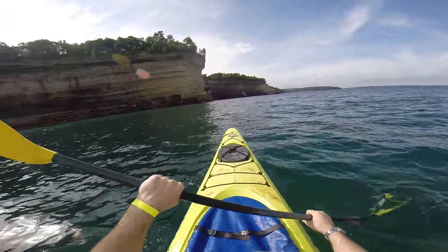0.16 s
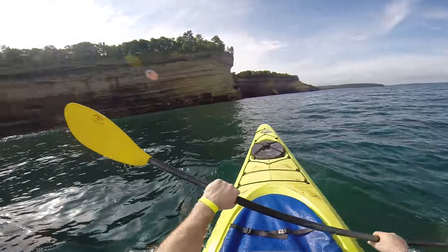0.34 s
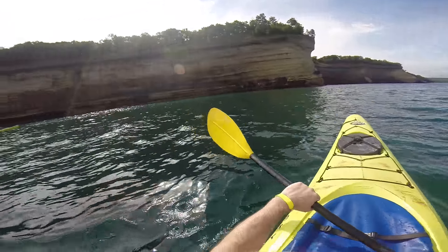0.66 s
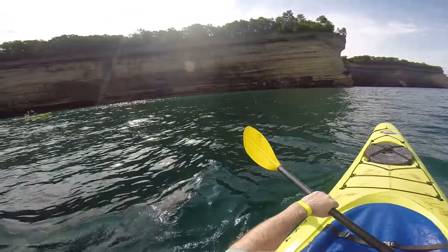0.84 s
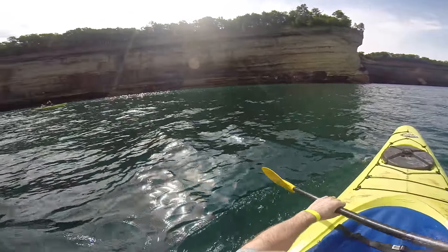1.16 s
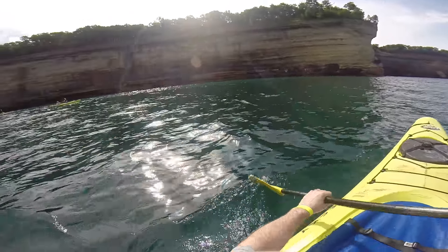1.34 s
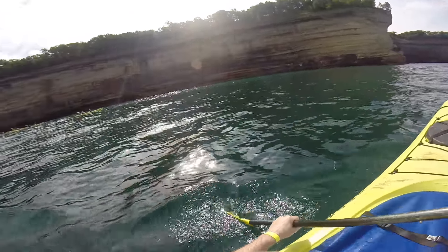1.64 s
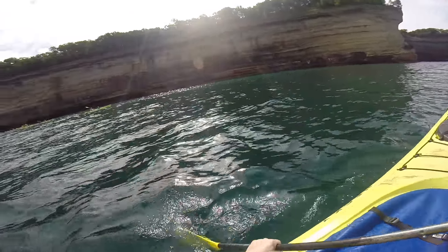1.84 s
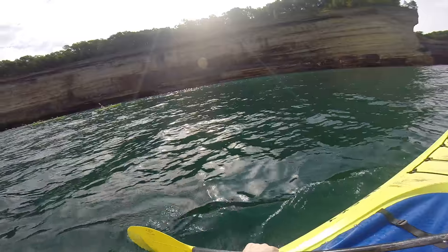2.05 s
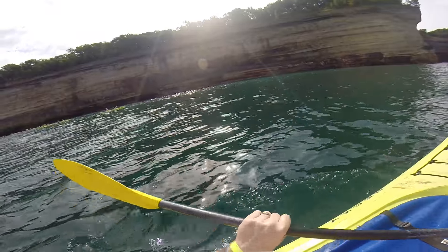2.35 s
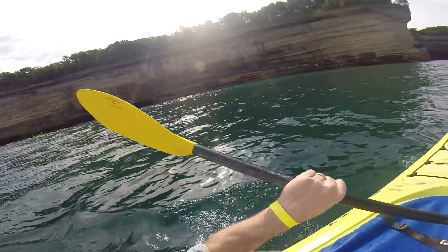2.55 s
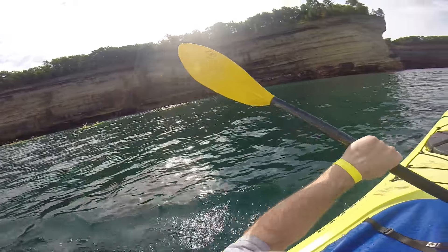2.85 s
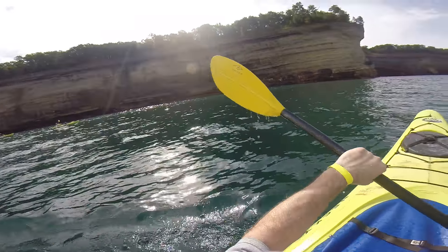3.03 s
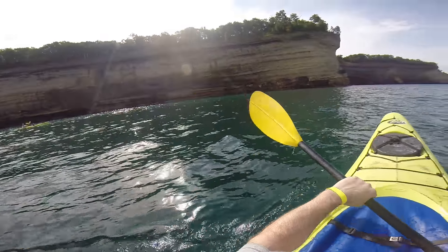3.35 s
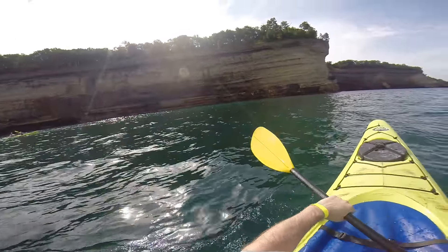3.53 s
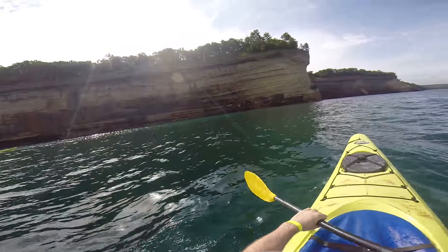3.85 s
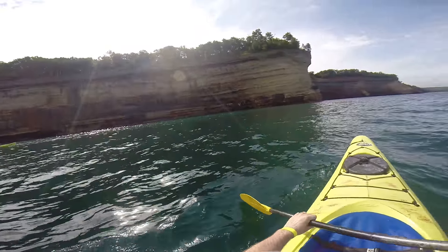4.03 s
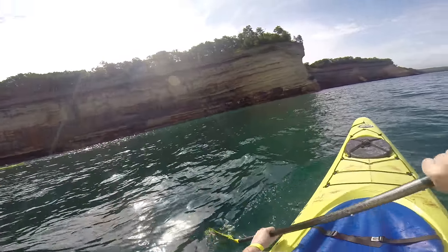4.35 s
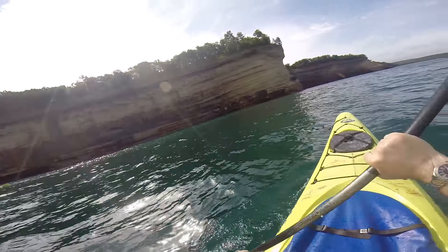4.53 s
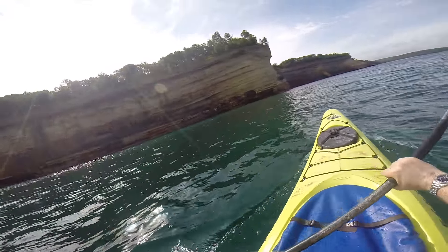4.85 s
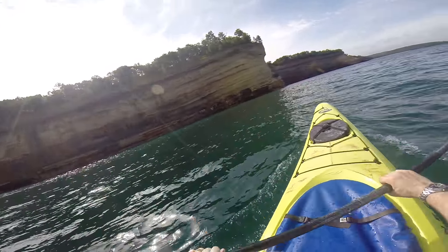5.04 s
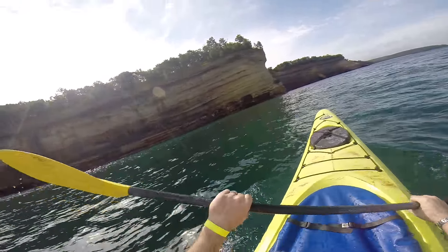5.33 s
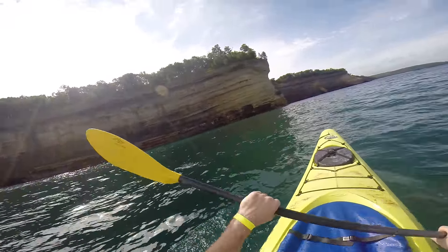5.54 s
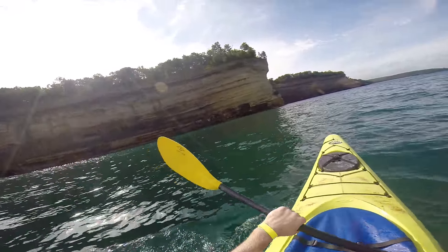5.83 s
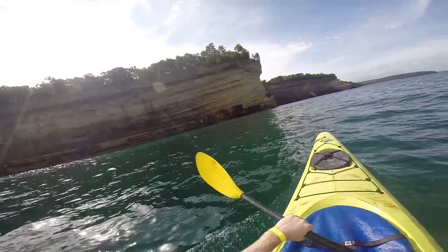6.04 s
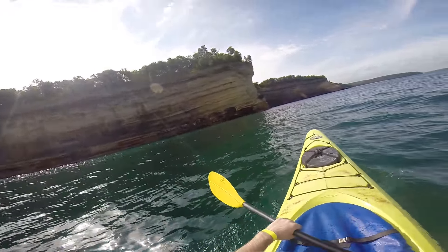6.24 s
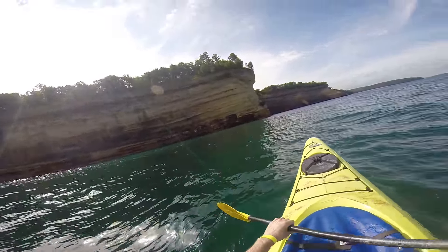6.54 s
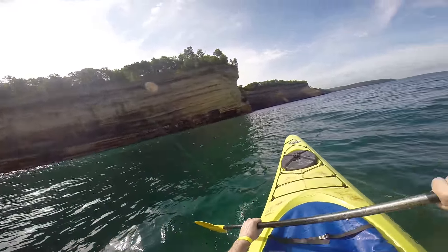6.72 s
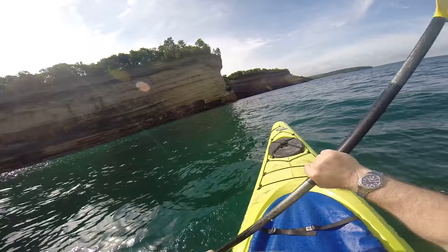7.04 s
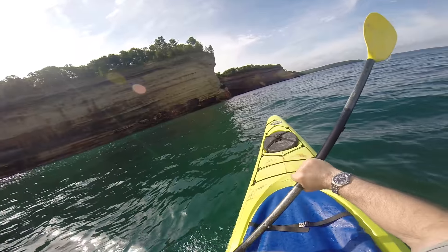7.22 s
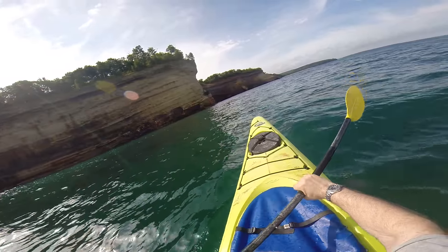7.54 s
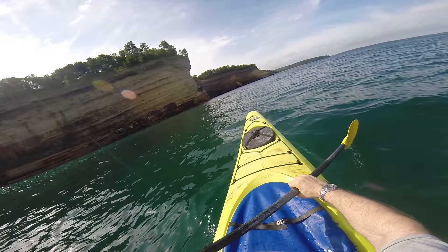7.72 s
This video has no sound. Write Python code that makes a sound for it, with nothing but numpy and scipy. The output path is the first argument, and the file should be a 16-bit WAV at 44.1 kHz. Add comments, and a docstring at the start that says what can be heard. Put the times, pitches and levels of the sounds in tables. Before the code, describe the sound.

Close watery churning with bubbly plops, small gulps and slaps from steady paddle strokes, over a soft water wash and muffled low rumble.

```python
"""Air buffets a waterproof case with a low rumble over the wash of open water: slow noise and drummed
resonances. A kayak's blades churn the water: clouds of short rings swell with each stroke, and wavelets lap in
a hollow note. Bubbles and drips plop as single bending chirps, and knocks ring the case in a shared note near
1.56 kHz; trapped air gulps as a tumble of larger bubbles. Slaps of water burst into grainy spatter, and the
paddle ticks now and then with a few hard, short modes. The camera inside the case adds its own faint hiss and
whine."""
import sys
import numpy as np
from scipy import signal
from scipy.fft import rfft, irfft, next_fast_len
from scipy.io import wavfile
from scipy.ndimage import uniform_filter1d

SR = 44100
rng = np.random.default_rng(int(sys.argv[2]) if len(sys.argv) > 2 else 0)


def inscribe(sig):
    """Save sig as 16-bit PCM at rate SR to the path in sys.argv[1].

    A 1-D sig is mono; a 2-D sig holds one channel per row.
    Samples are clipped to [-1, 1] before scaling.
    """
    pcm = np.round(np.clip(np.atleast_2d(sig).T, -1, 1) * 32767)
    wavfile.write(sys.argv[1], SR, pcm.astype(np.int16))


N = 347508
T = np.arange(N) / SR


def from_db(db):
    """Amplitude of a level in dB."""
    return 10 ** (np.asarray(db) / 20)


def rms_one(x):
    """Scales to rms 1."""
    return x / np.sqrt(np.mean(x ** 2) + 1e-20)


def in_time(rows):
    """Interpolates every column after the first over time."""
    knot_s, *columns = np.transpose(rows)
    return [np.interp(T, knot_s, column) for column in columns]


def at_hz(points, hz):
    """Reads a spectrum in dB on a log-frequency axis."""
    point_hz, point_db = np.array(points)[:, 0], np.array(points)[:, 1]
    return np.interp(np.log(hz + 1e-9), np.log(point_hz), point_db)


def drift(rate_hz):
    """Slow random control, rms 1: low-passed noise made at SR / 40."""
    step, settle = 40, 2000
    r = np.exp(-2 * np.pi * step * rate_hz / SR)
    white = rng.standard_normal(N // step + settle + 2)
    slow = signal.lfilter([1], [1, -2 * r, r * r], white)[settle:]
    return np.interp(np.arange(N) / step, np.arange(len(slow)), rms_one(slow))


def noise(spectrum, size=N, grain_db=0):
    """Coloured noise, rms 1; grain spreads the sample sizes, as of tiny uneven impacts."""
    padded = next_fast_len(size)
    hz = np.arange(padded // 2 + 1) * SR / padded
    grain = from_db(grain_db * rng.standard_normal(padded))
    white = rng.standard_normal(padded) * grain
    coloured = irfft(rfft(white) * from_db(at_hz(spectrum, hz)), padded)
    return rms_one(coloured[:size])


def resonate(x, hz, width_hz):
    """Two-pole resonance, gain 1 on top."""
    r = np.exp(-np.pi * width_hz / SR)
    zeros = np.array([1, 0, -1]) * (1 - r * r) / 2
    poles = [1, -2 * r * np.cos(2 * np.pi * hz / SR), r * r]
    return signal.lfilter(zeros, poles, x + 1e-18)


def ring_twice(x, hz, width_hz):
    """A resonance applied twice: soft start, steep skirts."""
    return resonate(resonate(x, hz, width_hz), hz, width_hz)


def evened(x, size):
    """Holds the level near 1 over stretches of size samples; faster detail stays."""
    power = np.abs(uniform_filter1d(x ** 2, size))
    return x / np.sqrt(power + 1e-3 * np.mean(x ** 2))


def pops(per_s, spread_db):
    """Random clicks of either sign, many small and a few large."""
    born = rng.random(N) < per_s / SR
    height = from_db(spread_db * np.minimum(rng.exponential(1, N), 3))
    return born * height * rng.choice([-1, 1], N)


def swell(time, rise_s):
    """Grows to 1 at time 0, then dies away a little more slowly."""
    u = np.maximum(1 + time / (np.sqrt(2) * rise_s), 0)
    return (u * np.exp(1 - u)) ** 4


def around(s, size=2200):
    """The samples within size of a moment."""
    return slice(max(int(s * SR) - size, 0), int(s * SR) + size)


def chirp(time, hz, rise_s, glide, phase):
    """One bubble swells, rings briefly and bends in pitch (glide in octaves per s, two octaves at most)."""
    pitch_hz = hz * 2 ** np.clip(glide * time, -2, 2)
    cycles = np.cumsum(pitch_hz, axis=-1) / SR + phase
    return swell(time, rise_s) * np.sin(2 * np.pi * cycles)


def wind(buffet_db, low_db, high_db):
    """Eddies push on the case and drum on two groups of its low resonances."""
    # air on the case: time_s, buffet_rel_db, low_drum_rel_db, high_drum_rel_db
    air_rows = [(0.0, -46, -53.5, -58), (0.28, -48.5, -57, -68), (0.42, -45.5, -47, -69),
                (0.64, -47, -57.5, -63.5), (1.28, -48.5, -53, -61), (1.52, -44.5, -67, -65),
                (1.6, -43.5, -60, -57), (1.84, -42, -64, -66), (2.0, -50.5, -49.5, -77),
                (2.18, -51.5, -62.5, -59), (2.4, -51.5, -55, -72), (2.48, -49.5, -65, -70),
                (2.64, -58, -57, -75), (2.96, -44.5, -63, -57), (3.12, -48.5, -58, -64),
                (3.2, -45, -50.5, -56), (3.52, -49.5, -59, -67), (3.68, -52.5, -55.5, -60),
                (4.0, -50.5, -57, -71), (4.4, -51, -52, -58.5), (4.8, -44, -53, -55.5),
                (4.96, -52, -51, -59), (5.12, -56.5, -63, -49.5), (5.2, -47.5, -52.5, -72),
                (5.44, -52, -57, -59), (5.76, -47, -55, -58), (5.84, -42.5, -58, -51),
                (6.08, -48.5, -62, -60), (6.16, -50, -51.5, -54), (6.72, -56, -58.5, -56),
                (6.96, -49.5, -51.5, -54), (7.28, -50, -48.5, -50.5), (7.44, -50.5, -68, -55.5),
                (7.52, -62, -50.5, -62), (7.76, -56, -54.5, -55.5), (7.86, -56, -58, -66.0)]
    # buffeting spectrum: freq_hz, density_rel_db
    buffet_spectrum = [(12, 4.5), (22, 2.5), (35, 0), (48, -9.5), (80, -21), (200, -69)]
    # lower and upper resonances: freq_hz, width_hz, rel_db
    low_modes = [(56.9, 27.3, 0.5), (73, 21, -8.5)]
    high_modes = [(100.7, 21, 6.5), (117.7, 20, -7.5)]
    push, low, high = in_time(air_rows)
    out = from_db(push + buffet_db) * evened(noise(buffet_spectrum), size=18000)
    for modes, drum_db in (low_modes, low + low_db), (high_modes, high + high_db):
        drum = np.zeros(N)
        for hz, width_hz, mode_db in modes:
            drum += from_db(mode_db) * rms_one(ring_twice(rng.standard_normal(N), hz, width_hz))
        out += from_db(drum_db) * evened(drum, size=9000)
    return out


def background(wash_db, waver_db):
    """Wash of open water, and the camera's hiss and whine as noise bands that waver together."""
    # wash spectrum: freq_hz, density_rel_db
    wash_spectrum = [(40, -29), (110, 4), (160, 2.5), (240, 0.63), (400, -3), (800, -6.5), (1200, -9),
                     (1300, -11), (2800, -13.5), (3900, -17.5), (6000, -21), (8000, -26), (11500, -30),
                     (15500, -35.5)]
    # electrical whine and hiss: freq_hz, width_hz, mean_level_db
    whine_bands = [(9347, 150, -91), (10780, 200, -90), (12800, 800, -90), (12899, 5, -95), (12947, 5, -94)]
    wash = from_db(wash_db + waver_db * drift(25)) * noise(wash_spectrum)
    whine = np.zeros(N)
    for hz, width_hz, band_db in whine_bands:
        whine += from_db(band_db) * rms_one(resonate(rng.standard_normal(N), hz, width_hz))
    return wash + whine * from_db(1.6 * drift(8.5))


def froth(spectrum, per_s, spread_db, sharpness, count):
    """Cloud of bubbles of count sizes: each click rings one size for a few cycles."""
    clicks, dealt = pops(per_s, spread_db), rng.integers(0, count, N)
    out = np.zeros(N)
    for k, hz in enumerate(np.geomspace(spectrum[0][0], spectrum[-1][0], count)):
        ring = ring_twice(clicks * (dealt == k), hz, hz / sharpness)
        # sqrt(hz): density per Hz over log-spaced bands
        out += from_db(at_hz(spectrum, hz)) * np.sqrt(hz) * rms_one(ring)
    return evened(out, size=8000)


def stirred(surges, calm_db):
    """Level of the water: surges (crest_s, db, rise_s) add in power on top of the calm."""
    power = np.full(N, from_db(calm_db) ** 2)
    for s, db, rise_s in surges:
        near = around(s, size=40000)
        power[near] += (from_db(db) * swell(T[near] - s, rise_s)) ** 2
    return np.sqrt(power)


def churn(gurgle_db, lap_db, spray_db):
    """Strokes fold air into the water and throw fine spray; lapping wavelets ring in the hollow case."""
    # a blade pushes or leaves the water: crest_s, gurgle_rel_db, spray_rel_db, rise_s
    stroke_rows = [(0.041, -67, -69, 0.12), (0.42, -67, -76, 0.13), (0.93, -66, -76, 0.21),
                   (1.2, -64, -72, 0.21), (1.58, -68, -77, 0.16), (2.021, -69.5, -70.5, 0.24),
                   (2.4, -77, -70, 0.042), (3.6, -68.5, -80, 0.16), (3.98, -63.5, -73, 0.077),
                   (4.161, -67, -67, 0.062), (4.66, -70, -75, 0.21), (5.2, -66, -71, 0.17),
                   (5.9, -64.5, -78, 0.21), (6.201, -63.5, -67.5, 0.061), (6.4, -68, -81, 0.038),
                   (6.669, -63, -70, 0.1), (7.011, -64, -69, 0.057), (7.5, -68.5, -77, 0.21),
                   (7.83, -64.5, -69.5, 0.13)]
    # a wavelet runs along the hull: crest_s, rel_db
    wavelet_rows = [(0.3, -72), (0.44, -66), (1.12, -72), (3.1, -83), (3.55, -69), (3.98, -67), (4.24, -70),
                    (4.78, -65), (5.2, -69), (5.8, -64), (6.02, -67), (6.46, -80), (6.67, -70), (7.01, -67),
                    (7.46, -72)]
    # bubble spectra: freq_hz, density_rel_db
    gurgle_spectrum = [(600, 1), (900, -6.5), (1200, 4), (1400, -9.5), (1900, -5), (2400, 2.5), (2900, 1),
                       (3700, -10)]
    spray_spectrum = [(3700, 1), (4600, 0), (5700, 1), (6500, -3.5), (7800, -8), (9400, -10.5),
                      (12000, -15)]
    # hollow note of the lapping: freq_hz, density_rel_db
    lap_spectrum = [(1430, -3), (1560, -1.5), (1720, -4)]
    spray_lag_s, wavelet_rise_s = 0.0051, 0.071
    gurgling = stirred([(s, db, rise_s) for s, db, _, rise_s in stroke_rows], calm_db=-70.5)
    spraying = stirred([(s + spray_lag_s, db, rise_s) for s, _, db, rise_s in stroke_rows], calm_db=-75.5)
    lapping = stirred([(s, db, wavelet_rise_s) for s, db in wavelet_rows], calm_db=-72)
    gurgle = gurgling * froth(gurgle_spectrum, per_s=1700, spread_db=3.0, sharpness=8.4, count=22)
    spray = spraying * froth(spray_spectrum, per_s=1100, spread_db=5.0, sharpness=9.0, count=14)
    lap = lapping * froth(lap_spectrum, per_s=190, spread_db=3.0, sharpness=5.8, count=5)
    return from_db(gurgle_db) * gurgle + from_db(lap_db) * lap + from_db(spray_db) * spray


def bubbles(level_db, slap_db, slap_s, shed_db, shed_s, shed_octaves, shed_cycles, shed_glide, count):
    """Larger bubbles and drips ring one by one, and knocks ring the case in its note near 1.56 kHz: a tiny
    slap, a bending ring, then the small bubbles shed."""
    # loudest bubbles and drips, and knocks and laps that ring the case near 1.56 kHz: crest_s, pitch_hz,
    # height_rel_db, rise_s, glide_octaves_per_s
    bubble_rows = [(0.034, 2310, -55.5, 0.0086, 13), (0.17, 1080, -48.5, 0.0036, 72),
                   (0.213, 1637, -47, 0.0011, 3), (0.268, 1730, -55, .006, 31),
                   (0.290, 1590, -52, 0.0058, 0.5), (0.362, 2450, -54, .0016, 11),
                   (0.528, 1065, -53, .0025, 41), (0.745, 2140, -53.5, 0.0027, 39),
                   (0.763, 894, -49.5, 0.0029, 39), (0.916, 2100, -56, 0.0092, 21.5),
                   (0.944, 743, -54, .004, 60.5), (0.990, 2394, -52, .002, 0), (1.077, 1146, -58, .005, 70),
                   (1.104, 1048, -56, 0.0065, 65.5), (1.157, 1697, -53, .0025, -9),
                   (1.216, 3394, -50, 0.00077, 40), (1.261, 5150, -53, .0016, 18),
                   (1.3206, 6600, -46, 0.00048, 4), (1.566, 2792, -50, .0016, -18),
                   (1.827, 2377, -53, .0025, 40.5), (1.874, 857, -55, .004, -20),
                   (1.991, 2450, -48, 0.0013, -11), (2.054, 2227, -52, .0025, 11),
                   (2.057, 5868, -53, .0006, 1), (2.098, 6180, -56, 0.0015, 3),
                   (2.103, 1600, -49, .0025, -13), (2.129, 2130, -45, 0.0019, 0),
                   (2.129, 932, -52, 0.005, 50), (2.138, 478, -54, 0.004, 3), (2.156, 623, -56, 0.0081, 20),
                   (2.158, 3540, -53, 0.0011, -18), (2.208, 883, -59, 0.007, 45),
                   (2.242, 770, -54, 0.0095, 36), (2.377, 3600, -52.5, .0016, -10.5),
                   (2.436, 7117, -54, 0.00094, 46), (2.826, 976, -46.5, 0.0025, 72),
                   (2.844, 1550, -51.5, 0.0035, -10), (3.1579, 1490, -47.5, 0.0018, -21),
                   (3.5561, 2120, -46, 0.0023, 18), (3.620, 2410, -49.5, 0.0023, -18.5),
                   (3.644, 5735, -53, .001, 1.5), (3.966, 1614, -48, 0.0011, 2),
                   (3.986, 7962, -55, .001, 9), (4.052, 3100, -50, 0.0013, -2),
                   (4.123, 4380, -52, 0.00092, 39), (4.162, 1585, -53, .004, 0.5),
                   (4.170, 3786, -52, .001, 12), (4.179, 2680, -49, 0.0015, -23),
                   (4.184, 5790, -54, 0.0012, 2), (4.260, 1575, -51.5, 0.0018, 0.5),
                   (4.323, 1533, -51.5, .006, 18), (4.3883, 5000, -48, .0012, 40),
                   (4.443, 4750, -53, 0.0013, -20), (4.756, 1559, -55, 0.0055, -23),
                   (4.8826, 1590, -45, 0.0034, -0.5), (4.971, 2770, -50, 0.0013, -3.5),
                   (5.171, 2590, -54, .004, -2), (5.183, 2430, -57, .0025, -20),
                   (5.273, 2906, -52, .001, 2.5), (5.379, 2410, -55, .0025, 1),
                   (5.779, 1560, -53, 0.0039, 43.5), (5.801, 3090, -46.5, 0.002, 1),
                   (5.8745, 3380, -41.5, 0.00147, 4), (5.966, 2310, -51, 0.00065, -3),
                   (6.062, 1453, -50, .006, 47), (6.117, 1471, -51.5, .004, 22),
                   (6.176, 2400, -53, 0.0022, -16.5), (6.224, 5800, -53, 0.0015, -12),
                   (6.3596, 2409, -44, 0.0017, 15), (6.462, 1580, -58.5, 0.026, -0.5),
                   (6.571, 2420, -51.5, 0.0022, 21), (6.6067, 1102, -43.5, 0.0011, 40.5),
                   (6.641, 2300, -51, 0.0014, -20), (6.648, 4320, -58, .0016, 9.5),
                   (6.658, 1585, -49, .0016, -10), (6.675, 1470, -50, 0.0043, 61.5),
                   (6.687, 1573, -46, 0.0012, -1), (6.7227, 3453, -49.5, .0016, -12),
                   (6.729, 923, -52.5, .0025, -21), (6.9953, 1550, -45, 0.0047, -6),
                   (7.031, 5050, -55, 0.00092, 42), (7.2103, 1587, -45.5, 0.0025, 1.5),
                   (7.322, 1530, -51, 0.0046, 7), (7.382, 1286, -53.5, .006, 37),
                   (7.455, 1460, -58, 0.0041, 68), (7.484, 1480, -48, 0.0039, 21),
                   (7.4987, 869, -43.5, 0.0038, 90), (7.506, 1560, -46.5, 0.0027, 0),
                   (7.542, 1559, -50, .0025, -20), (7.548, 900, -51, 0.0028, -41.5),
                   (7.595, 471, -50, .004, -2), (7.618, 1597, -39, 0.002, 1), (7.636, 1750, -62, 0.0055, 0)]
    out = np.zeros(N)
    for s, hz, height_db, rise_s, glide in bubble_rows:
        near = around(s, size=3000)
        time = T[near] - s
        hiss = rms_one(ring_twice(rng.standard_normal(len(time)), hz, 0.85 * hz))
        slap = swell(time + rise_s, slap_s) * hiss
        when, size, phase = rng.random((3, count, 1))
        shed_hz = hz * 2 ** (shed_octaves * (2 * size - 1))
        shed_time = time - rise_s - when * shed_s
        small = chirp(shed_time, shed_hz, shed_cycles / shed_hz, shed_glide, phase)
        shed = (np.exp(-when) * small).sum(axis=0)
        ring = chirp(time, hz, rise_s, glide, rng.random())
        plop = ring + from_db(slap_db) * slap + from_db(shed_db) * shed
        out[near] += from_db(height_db + level_db) * plop
    return out


def gulps(level_db, spread_octaves, rise_octaves, rise_cycles, glide, count):
    """A pocket of air breaks into a tumble of large bubbles, mostly biggest first, so the pitch climbs."""
    # water closing over a blade or under the hull: middle_s, pitch_hz, rel_db, length_s
    gulp_rows = [(0.067, 700, -57, 0.014), (1.029, 263, -58.5, 0.056), (1.871, 885, -61, 0.069),
                 (2.179, 600, -60, 0.073), (4.549, 1180, -57, 0.03), (4.838, 700, -55.5, 0.023),
                 (5.182, 690, -57, 0.033), (5.482, 440, -50, 0.02), (5.82, 604, -56.5, 0.048),
                 (6.073, 1090, -59, 0.029), (6.647, 1000, -67, 0.053), (7.497, 1250, -50, 0.016)]
    out = np.zeros(N)
    for s, hz, gulp_db, length_s in gulp_rows:
        near = around(s, size=12000)
        time = T[near] - s
        when, size, phase = rng.random((3, count, 1))
        # one bubble in each of count equal slots, -1 to 1
        when = 2 * (np.arange(count)[:, None] + when) / count - 1
        pitch_hz = hz * 2 ** (rise_octaves * when + spread_octaves * (2 * size - 1))
        rings = chirp(time - when * length_s, pitch_hz, rise_cycles / pitch_hz, glide, phase)
        tumble = (np.cos(when) * rings).sum(axis=0)
        # energy as of rms 1 over length_s
        unit = np.sqrt(length_s * SR / np.sum(tumble ** 2))
        out[near] += from_db(gulp_db + level_db) * tumble * unit
    return out


def splashes(level_db, grain_db):
    """Water slaps on a blade and bursts into a short grainy spatter."""
    # slaps: crest_s, rel_db, rise_s, tilt_db_per_octave
    splash_rows = [(0.072, -66, 0.011, -5.5), (0.928, -68, 0.036, -4), (1.063, -67.5, 0.005, 4),
                   (1.138, -69, .035, -4), (1.19, -55, 0.002, -5.5), (1.217, -66, 0.0046, 1),
                   (1.595, -70, .005, 6), (2.103, -66, .002, -8), (2.137, -63, 0.0034, -4.5),
                   (2.232, -66.5, 0.0061, -1), (2.409, -73, .02, 4), (3.548, -65, .0015, -5),
                   (4.164, -65.5, 0.0083, 1.5), (4.176, -70, .003, 1), (4.388, -61, 0.0052, -3),
                   (4.755, -63, 0.0065, -4.5), (5.189, -68, 0.012, 2), (5.23, -69, 0.016, 4.5),
                   (5.262, -69, .009, 2), (5.871, -63, .0035, -4), (6.662, -64, .0015, 0),
                   (6.725, -63, 0.0013, -2), (6.7977, -55.5, 0.0036, 0.5), (6.807, -62, 0.0022, 0),
                   (6.99, -57, 0.0011, -4), (7.258, -62.5, 0.0022, -1), (7.4828, -55, 0.0012, -10),
                   (7.571, -66, .006, -2), (7.617, -57, .0014, -3)]
    # spatter spectrum before tilt: freq_hz, density_rel_db
    spatter_spectrum = [(200, -1.5), (800, -0.5), (1600, 5), (2800, 10), (4200, -3), (6200, 0),
                        (8000, -11.5), (10500, -13.5), (14000, -27)]
    out = np.zeros(N)
    for s, slap_db, rise_s, tilt_db in splash_rows:
        near = around(s, size=6000)
        shape = swell(T[near] - s, rise_s)
        tilted = [(hz, db + tilt_db * np.log2(hz)) for hz, db in spatter_spectrum]
        spatter = noise(tilted, size=len(shape), grain_db=grain_db)
        burst = rms_one(shape * spatter) * np.sqrt(np.mean(shape ** 2))
        out[near] += from_db(slap_db + level_db) * burst
    return out


def ticks(level_db):
    """Small hard ticks of the paddle strike the same few decaying modes, brighter or duller."""
    # ticks: start_s, rel_db, tilt_db_per_octave
    tick_rows = [(0.118, -57, 12), (2.602, -55, -1), (2.6105, -56.5, -10), (5.230, -55, 10),
                 (5.247, -61, 8), (5.2583, -49, 9), (5.2602, -49.5, 14), (6.797, -55, -3), (7.460, -45, 15),
                 (7.829, -53, 8), (7.855, -51, 6)]
    # modes: freq_hz, rel_db, t60_s
    tick_modes = [(5650, 4, 0.0061), (5960, -5.5, 0.028), (9630, -2.5, 0.0087), (9480, 2.5, 0.0033),
                  (10700, -8.5, 0.0051), (12000, -12, 0.0045), (13800, -20, 0.0037)]
    contact_s, tilt_pivot_hz = 1e-4, 9000
    out = np.zeros(N)
    for s, tick_db, tilt_db in tick_rows:
        near = around(s)
        time = np.maximum(T[near] - s, 0)
        contact = 1 - np.exp(-time / contact_s)
        for (hz, mode_db, t60_s), phase in zip(tick_modes, rng.random(len(tick_modes))):
            struck_db = level_db + tick_db + mode_db + tilt_db * np.log2(hz / tilt_pivot_hz)
            decay = from_db(struck_db - 60 * time / t60_s)
            out[near] += contact * decay * np.sin(2 * np.pi * (hz * time + phase))
    return out


def scene():
    """Everything is close by and in the open, so nothing echoes."""
    air = wind(buffet_db=2.5, low_db=0.5, high_db=-2.5)
    air += background(wash_db=-58.5, waver_db=0.66)
    water = churn(gurgle_db=-0.5, lap_db=0.0, spray_db=-2.0)
    drops = bubbles(level_db=-2.0, slap_db=-12, slap_s=0.00095, shed_db=-12.5, shed_s=0.02,
                    shed_octaves=0.45, shed_cycles=3.3, shed_glide=23, count=3)
    water += gulps(level_db=-5.5, spread_octaves=0.45, rise_octaves=0.4, rise_cycles=3.5, glide=35, count=11)
    drops += splashes(level_db=8.0, grain_db=5.5)
    return (water + drops + ticks(level_db=2.0) + air)[None]


def record(dry):
    """Cuts the deepest sway below 9 Hz and the top above 15.3 kHz."""
    low_cut = signal.butter(2, 9, "high", fs=SR, output="sos")
    top_cut = signal.ellip(10, 0.2, 70, 15300, fs=SR, output="sos")
    return signal.sosfilt(top_cut, signal.sosfilt(low_cut, dry))


dry = scene()
out = record(dry)
inscribe(out)
```